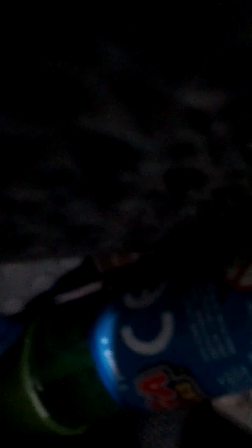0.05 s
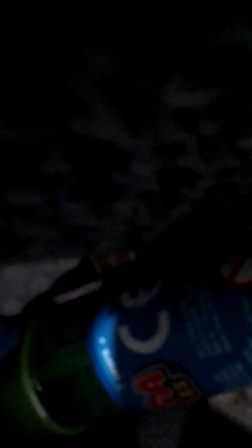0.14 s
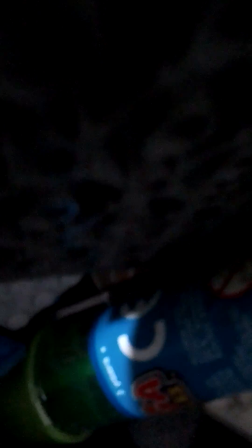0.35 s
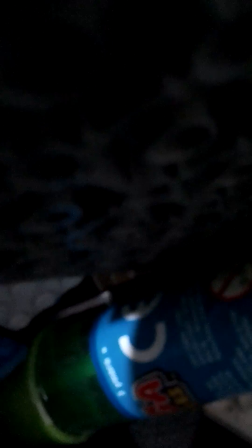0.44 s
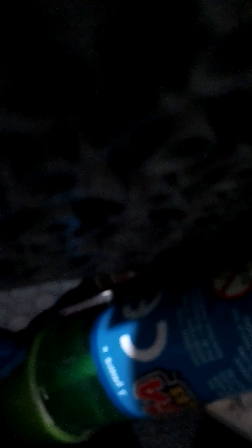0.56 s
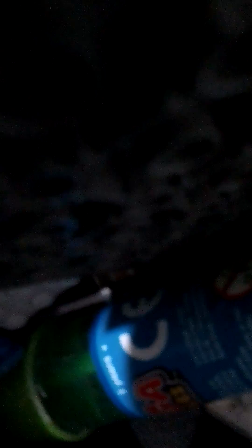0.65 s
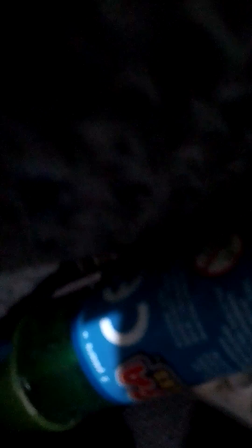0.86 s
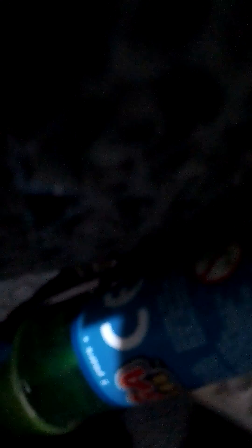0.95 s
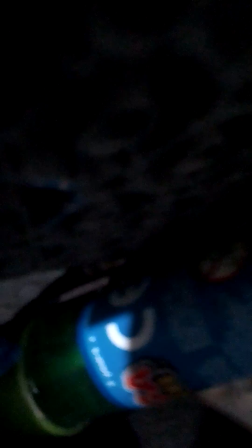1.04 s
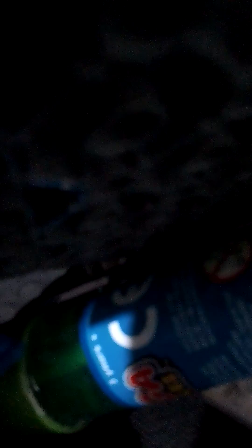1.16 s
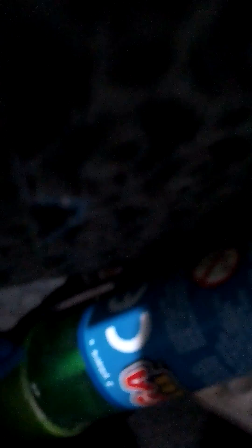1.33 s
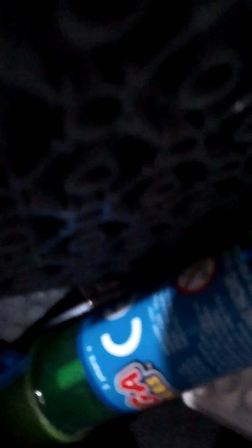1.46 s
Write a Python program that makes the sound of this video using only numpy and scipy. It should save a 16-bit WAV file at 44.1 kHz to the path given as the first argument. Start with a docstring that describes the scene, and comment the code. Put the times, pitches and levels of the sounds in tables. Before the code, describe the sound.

Small hard plastic pieces are stirred in a container, making a close, dense crunch from the start. Sharp clacks and brief pings stand out at about 0.35, 0.55, 0.7 and 0.9 seconds. The busiest clatter comes from 1.0 to 1.15 seconds, with the container wall ringing and soft, dull thumps. The crunch then fades, and a few last pieces click into place by 1.5 seconds in a quiet room.

```python
"""A steady, close crunch of small hard plastic pieces being stirred in a container, in a quiet room.
Countless tiny contacts make the crunch. Now and then a jammed piece slips and clacks against its
neighbours or the ringing wall, and loose pieces ping. The heap shuffles and thumps dully,
and a few last pieces settle."""
import sys
import numpy as np
from scipy import signal
from scipy.fft import rfft, irfft, next_fast_len
from scipy.io import wavfile
from scipy.ndimage import map_coordinates

SR = 44100
rng = np.random.default_rng(int(sys.argv[2]) if len(sys.argv) > 2 else 0)


def materialize(psi):
    """Save the field psi as 16-bit PCM at rate SR to the path in sys.argv[1].

    A 1-D psi becomes a single channel; in a 2-D psi each row is a channel.
    """
    bounded = np.clip(np.atleast_2d(psi).T, -1, 1)
    quanta = np.round(bounded * 32767).astype(np.int16)
    wavfile.write(sys.argv[1], SR, quanta)


N = 66150
T = np.arange(SR // 5) / SR  # the seconds of one short sound
RISE_S = 0.00059  # how quickly a slip or a ring builds up

# How hard the heap is stirred: time_s, level_db
STIRRING = [(0, -36.5), (.085, -40.5), (.105, -35.5), (.15, -40.5), (.21, -36), (.235, -41), (.255, -32),
            (.29, -35), (.33, -32.5), (.37, -32.5), (.39, -41), (.415, -38), (.44, -34), (.47, -38),
            (.485, -32.5), (.51, -33), (.53, -29), (.605, -34.5), (.635, -29), (.68, -33), (.692, -25),
            (.718, -26.5), (.73, -26.5), (.76, -32), (.835, -32), (.86, -35.5), (.915, -38), (.965, -39.5),
            (1.0, -35.5), (1.06, -30.5), (1.12, -33.5), (1.16, -32), (1.2, -44.5), (1.275, -45),
            (1.295, -50), (1.37, -55.5), (1.395, -74), (1.46, -72), (1.5, -93.5)]
# The dull tone of the heap: frequency_hz, level_db
HEAP_TONE = [(30, -27), (70, -32), (125, -18), (168, -27), (218, -2.5), (370, 0), (520, -2.5), (700, -7.5),
             (950, -1.5), (1400, -8), (3000, -37)]


def crunch():
    """Stirring rubs the pieces together in clumps of tiny ringing ticks that also sound the wall."""
    # The tone of the ticks: frequency_hz, level_db
    tick_tone = [(100, -49.5), (700, -20), (1000, -8), (1300, -8.5), (1700, 0.5), (2100, -1), (3300, -0.5),
                 (4300, -1.5), (6000, 0), (8000, -5), (10000, -11), (12000, -26.5), (15500, -33)]
    # How loud the wall rings next to the ticks: time_s, level_db
    wall_levels = [(0, -16), (.93, -12), (1.0, -6), (1.27, -13.5), (1.4, -7)]
    crunch_db, clump_db, tinkle_db, ring_cycles = -1.35, 1.52, -8.5, 46
    effort_db = curve(STIRRING) + clump_db * wobble(per_s=170)
    hits = contacts(per_s=4500, samples=N)
    starts = np.flatnonzero(hits)[:, None]
    pitch_hz = rng.uniform(1001, 14780, N)[starts]
    steps = np.arange(SR // 50)
    grains = hits[starts] * np.sqrt(pitch_hz) * ring(pitch_hz, ring_cycles / pitch_hz, steps / SR)
    ringing = np.bincount((starts + steps).ravel(), grains.ravel(), N)[:N]  # add each at its start
    ticks = unit(with_tone(unit(ringing) + 0.79 * unit(hits), tick_tone))
    wall = amp(curve(wall_levels)) * unit(signal.fftconvolve(hits, wall_ring())[:N])
    return amp(effort_db + crunch_db) * (ticks + wall + amp(tinkle_db) * tinkles())


def clacks():
    """Each slip is a quick run of contacts that sounds the piece, the heap under it and the wall."""
    # Slipping pieces: start_s, level_db, length_s, pitch_hz, heap_db, wall_db (last two relative)
    slips = [ (0.054, -35.5, 0.0039, 6080, -5.5, -24), (0.1002, -36.5, 0.011, 5360, -14, -20),
             (.1020, -37.5, 0.006, 1310, -10, -23), (0.1654, -35.5, 0.0042, 4800, -10, -20),
             (0.184, -33, 0.0033, 3500, -9.5, -15), (.2150, -34, 0.0041, 3400, -15, -23),
             (0.279, -33, 0.006, 5460, -14.5, -12), (0.302, -33, 0.0064, 6130, -11, -24),
             (.3230, -32, .008, 3200, -7.5, -20), (0.35, -28.5, 0.0032, 6450, -29, -3),
             (0.3546, -21.5, 0.0018, 3450, -20, -13), (0.366, -33.5, 0.0077, 3000, -20, -2),
             (0.379, -30.5, 0.0037, 6400, -25, -20), (0.433, -35.5, 0.0044, 2000, -33, -20),
             (0.456, -32.5, 0.0065, 5700, -37, -12), (0.4755, -32.5, 0.004, 5700, -29, -26),
             (0.517, -30, 0.0057, 8000, -20, -22), (0.535, -24, 0.0033, 2600, -6.5, -19),
             (0.5413, -31, .003, 4930, -12, -20), (.5595, -19.5, 0.0012, 1900, -6, -15),
             (0.5617, -17, 0.0027, 5000, -17.5, -6), (0.583, -34.5, .007, 3000, -28, -18),
             (0.6273, -30.5, 0.0074, 5450, -22, -24), (0.641, -32.5, 0.0068, 5000, -5, -25),
             (0.6838, -25.5, 0.0062, 5000, -10, -26), (0.6995, -28, 0.003, 8700, -17, -15),
             (0.703, -19, 0.0014, 1630, -24, -26), (0.708, -19, 0.0027, 3470, -21, -27),
             (0.7453, -26.5, 0.0027, 4970, -28, -25), (0.779, -29, 0.0054, 4570, -13, -22),
             (0.8738, -30.5, 0.0038, 5330, -30, -22), (.8900, -19.5, 0.003, 3100, -13.5, -5),
             (.8920, -20.5, 0.004, 6700, -25, -12), (0.8944, -22, 0.0035, 1880, -13, -17),
             (0.932, -30.5, 0.0074, 5050, -26, -11), (0.926, -38.5, 0.0045, 4000, -18, -16.5),
             (0.978, -23.5, 0.0089, 5260, -21.5, -10.5), (0.988, -25.5, 0.0034, 5370, -21, -12),
             (1.005, -18, 0.0017, 1990, -18, 1), (1.017, -21.5, 0.0041, 5200, -31, -8),
             (1.0273, -24, 0.008, 3350, -16, -10), (1.0402, -21.5, 0.0013, 9500, -28, -19),
             (1.0408, -14, 0.0037, 5020, -32, -12), (1.0745, -20.5, 0.0074, 4260, -29, -11),
             (1.084, -24.5, 0.0042, 6000, -13.5, -17.5), (1.0927, -26, 0.0054, 5030, -20.5, 0.5),
             (1.098, -17.5, 0.0031, 4550, -26, -2), (1.101, -16, 0.0055, 5460, -31, -4),
             (1.1412, -29.5, 0.009, 3300, -9.5, 0), (1.1523, -24, 0.0035, 5600, -14.5, -1.5),
             (1.1823, -32, 0.0042, 4930, -28, -11), (1.229, -35, 0.0054, 5640, -25, -18),
             (1.2373, -40.5, 0.011, 2720, -26.5, -7.5), (1.257, -45, 0.0082, 2090, -21.5, 3),
             (1.2790, -38, 0.0041, 4030, -13.5, -5), (1.2993, -37.5, 0.0014, 4360, -14, -19),
             (1.3072, -35.5, 0.0044, 4050, -9.5, -2), (1.3244, -34, 0.0027, 4600, -15, -10),
             (1.347, -27, 0.0021, 2840, -14.5, -16), (1.367, -44.5, 0.01, 3530, -11, -3.5),
             (1.425, -58, .003, 12500, -12, -23), (1.4378, -39.5, 0.0011, 3980, -28, -24),
             (1.4408, -48, 0.0032, 3940, -22, -9), (1.4500, -47.5, 0.0026, 5500, -20, -22),
             (1.465, -65, 0.0027, 4500, -14.5, -17)]
    # The tone all struck pieces share: frequency_hz, level_db
    clack_tone = [(100, -50.5), (500, -17.5), (1300, -5.5), (2000, 5), (4000, 2.5), (6000, 4.5), (8000, 0),
                  (10500, -8), (13000, -12), (15500, -24)]
    peak_db, peak_octaves, fall_s = 7.5, 0.18, 0.002

    def piece_db(hz, pitch_hz):
        """A piece is strongest around its pitch and weaker well above it."""
        octaves = np.log2((hz + 1) / pitch_hz)
        peak = peak_db * np.exp(-.5 * (octaves / peak_octaves) ** 2)
        return along(clack_tone, hz) + peak - 7 * np.maximum(octaves - .5, 0)

    out = np.zeros(N)
    for start_s, level_db, length_s, pitch_hz, heap_db, wall_db in slips:
        shape = np.minimum(T / RISE_S, 1) * np.exp(-np.maximum(T - 0.83 * length_s, 0) / fall_s)
        hits = shape * contacts(per_s=9000, samples=len(T))
        piece = burst(coloured(hits, lambda hz: piece_db(hz, pitch_hz)), length_s)
        thud = with_tone(fading_noise(fade_s=0.034), HEAP_TONE)  # the heap soon damps a blow
        heap = amp(heap_db) * burst(thud, length_s)
        wall = amp(wall_db) * burst(wall_ring(), length_s)
        add(out, start_s, amp(level_db) * (piece + heap + wall))
    return out


def wall_ring():
    """The wall rings with several notes at once, a little different wherever it is touched."""
    # The wall's own notes: pitch_hz, level_db, fade_s
    wall_notes = [(2108, 0, 0.036), (2918, -14, 0.12), (3367, -9, 0.045), (4060, -10, 0.068),
                  (4760, -17.5, 0.1), (4530, -7, 0.064), (4670, -16, 0.08), (4941, -18, 0.079),
                  (5210, -15, 0.07), (5540, -9.5, 0.087), (5900, -13, 0.043), (6440, -9, 0.046)]
    out = np.zeros(len(T))
    for pitch_hz, level_db, fade_s in wall_notes:
        gain = amp(level_db + rng.normal(0, 0.99))
        out += gain * ring(pitch_hz * rng.normal(1, 0.0033), fade_s) * rng.choice([-1, 1])
    return out * onset(RISE_S)


def pings():
    """A piece that is free to move rings with one clear note."""
    # Freely ringing pieces: start_s, level_db, pitch_hz, fade_s
    notes = [(0.2414, -18, 5470, .035), (.3548, -20, 2360, 0.017), (0.5618, -11, 2900, 0.011),
             (0.5622, -11.5, 3820, 0.013), (.7085, -13.5, 1730, .017), (.8228, -19, 6184, 0.03),
             (1.0046, -8, 2155, 0.016), (1.0418, -14.5, 5040, .016), (1.084, -22, 6760, .014),
             (1.1005, -10.5, 2164, 0.034), (1.3463, -16, 2540, 0.013), (1.3461, -24.5, 5470, 0.018)]
    out = np.zeros(N)
    for start_s, level_db, pitch_hz, fade_s in notes:
        add(out, start_s, amp(level_db) * ring(pitch_hz, fade_s) * onset(rise_s=0.00037))
    return out


def tinkles():
    """Loose pieces on top of the heap ring briefly, the higher ones more softly."""
    per_s, middle_hz, range_octaves = 130, 5960, 1.5
    out = np.zeros(N)
    for when, height, strength in rng.random((int(per_s * N / SR), 3)):
        pitch_hz = middle_hz * 2 ** (range_octaves * (height - .5))
        note = ring(pitch_hz, fade_s=0.024) * onset(RISE_S)
        add(out, when * N / SR, amp(6.3 * strength - 7 * height) * note)
    return unit(out)


def thumps():
    """A soft push rings the full container roughly and briefly; it is too small to give deep bass."""
    # Shifts of the whole heap: start_s, level_db, pitch_hz, fade_s
    shifts = [(.358, -38, 473, 0.08), (.7060, -33, 977, 0.042), (.8910, -36.5, 570, 0.037),
              (.8915, -32, 988, 0.033), (0.986, -36.5, 400, 0.094), (1.0410, -38.5, 790, 0.02),
              (1.043, -31, 108, 0.065), (1.047, -35, 381, 0.085), (1.096, -36, 522, 0.068),
              (1.307, -36, 327, 0.027), (1.3062, -43.5, 749, 0.028), (1.3653, -39.5, 337, 0.021),
              (1.366, -38.5, 570, 0.027)]
    low_cut_hz = 247
    out = np.zeros(N)
    for start_s, level_db, pitch_hz, fade_s in shifts:
        rub = coloured(fading_noise(fade_s), lambda hz: -14 * np.log2((hz + 1) / pitch_hz) ** 2)
        thump = unit(ring(pitch_hz, fade_s)) + 0.62 * unit(rub)
        add(out, start_s, amp(level_db) * burst(thump, fade_s / 6))
    return signal.sosfilt(signal.butter(3, low_cut_hz, 'high', fs=SR, output='sos'), out)


def shuffle():
    """The low shuffle of the whole heap follows the stirring loosely and stops with it."""
    usual_db, follow, end_s, fall_s = -49.5, 0.74, 1.37, 0.021
    stir_db = curve(STIRRING)
    moving = np.exp(-np.maximum(np.arange(N) / SR - end_s, 0) / fall_s)
    bumps = unit(with_tone(contacts(per_s=1500, samples=N), HEAP_TONE))
    level_db = usual_db + follow * (stir_db - np.median(stir_db)) + 0.39 * wobble(per_s=40)
    return moving * amp(level_db) * bumps


def with_echoes(x):
    """Add a faint room echo and quick echoes inside the container that change as the pieces move."""
    # How long the room's echo lasts: frequency_hz, fade_s
    room_fades = [(200, 0.34), (2000, 0.24), (12000, 0.07)]
    room_db, hollow_db, change_s = -21, -12.5, 0.06
    hz, t, spectrum = signal.stft(rng.standard_normal(SR // 2), SR, nperseg=256)
    fading = amp(-60 * t / along(room_fades, hz)[:, None])
    room = signal.istft(spectrum * fading, SR, nperseg=256)[1]
    out = x + amp(room_db) * echo(x, room)
    for time_s in np.arange(0, N / SR + change_s, change_s):
        share = np.maximum(1 - np.abs(np.arange(N) / SR - time_s) / change_s, 0)
        hollow = fading_noise(fade_s=0.017) * (T > .001)
        out += amp(hollow_db) * echo(x * np.sqrt(share), hollow)
    return out


def hush():
    """The quiet room is a faint, low, steady noise."""
    # The tone of the room's hush: frequency_hz, level_db
    hush_tone = [(20, 4), (70, -1), (300, 26.5), (1000, -7), (6000, -25), (15000, -35.5)]
    return amp(-77.5) * unit(with_tone(rng.standard_normal(N), hush_tone))


def contacts(per_s, samples):
    """Tiny hits at random moments, of uneven strength."""
    spread_db = 3.5
    hits = (rng.random(samples) < per_s / SR) * rng.choice([-1, 1], samples)
    return hits * amp(spread_db * np.minimum(rng.exponential(size=samples), 2.6))


def ring(hz, fade_s, t=T):
    """A vibration that fades by 60 dB in fade_s."""
    return np.sin(2 * np.pi * hz * t) * amp(-60 * t / fade_s)


def fading_noise(fade_s):
    """Noise that fades by 60 dB in fade_s."""
    return rng.standard_normal(len(T)) * amp(-60 * T / fade_s)


def onset(rise_s):
    """A rise from 0 to 1 that softens the start of a sound."""
    return 1 - np.exp(-T / rise_s)


def echo(x, response):
    """The echo of x in a space that answers a click with this response."""
    return signal.fftconvolve(x, response / np.linalg.norm(response))[:N]


def amp(db):
    """Turn decibels into a multiplier."""
    return 10 ** (np.asarray(db) / 20)


def unit(x):
    """Scale to an average power of 1."""
    return x / np.sqrt(np.mean(x ** 2) + 1e-20)


def burst(x, seconds):
    """Scale to the energy of power 1 held for that long."""
    return x * np.sqrt(seconds * SR / (np.sum(x ** 2) + 1e-20))


def curve(points):
    """Join (time_s, value) points with straight lines."""
    return np.interp(np.arange(N) / SR, *np.transpose(points))


def along(points, hz):
    """Read between (frequency_hz, value) points, with octaves evenly spaced."""
    frequencies, values = np.transpose(points)
    return np.interp(np.log(hz + 1), np.log(frequencies + 1), values)


def wobble(per_s):
    """A smooth curve through per_s random values a second."""
    return map_coordinates(rng.standard_normal(int(N * per_s / SR) + 4), [np.arange(N) * per_s / SR])


def coloured(x, db_at):
    """Turn each frequency up or down by db_at(hz) decibels."""
    size = 2 * next_fast_len(len(x))
    gain = amp(db_at(np.fft.rfftfreq(size, 1 / SR)))
    cepstrum = irfft(np.log(gain + 1e-6))
    # Fold it in half so that nothing rings before its hit.
    cepstrum[1:size // 2] *= 2
    cepstrum[size // 2 + 1:] = 0
    return irfft(rfft(x, size) * np.exp(rfft(cepstrum)))[:len(x)]


def with_tone(x, tone):
    """Colour x with a (frequency_hz, level_db) table."""
    return coloured(x, lambda hz: along(tone, hz))


def filtered(x, gain):
    """Multiply each frequency by gain(hz)."""
    size = next_fast_len(N + SR // 2)
    return irfft(rfft(x, size) * gain(np.fft.rfftfreq(size, 1 / SR)), size)[..., :N]


def add(track, start_s, x):
    """Mix x into the track at start_s."""
    start = max(round(start_s * SR), 0)
    track[start:start + len(x)] += x[:max(N - start, 0)]


def scene():
    """The stirred pieces, brightest in the hard clacks and dull as they settle, over the room's hush."""
    # How far the highest treble is turned up or down: time_s, level_db
    treble_levels = [(0, -4), (.11, 1.5), (.22, -10), (.4, -4), (.6, 5), (.89, -3.5), (.96, 2), (1.04, 6),
                     (1.17, 7.5), (1.27, -3), (1.32, -18), (1.5, -13)]
    treble_from_hz = 9470
    pieces = with_echoes(crunch() + shuffle() + clacks() + pings() + thumps())
    treble = filtered(pieces, lambda hz: 1 - 1 / (1 + (hz / treble_from_hz) ** 14))
    return (pieces + (amp(curve(treble_levels)) - 1) * treble + hush())[None]


def record(dry):
    """Cut off the very highest frequencies."""
    return filtered(dry, lambda hz: hz < 15900)


dry = scene()
out = record(dry)
materialize(out)
```